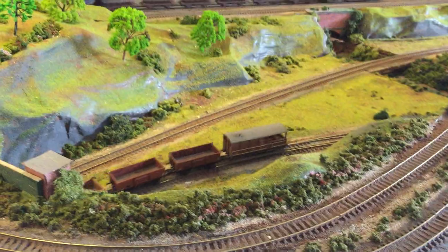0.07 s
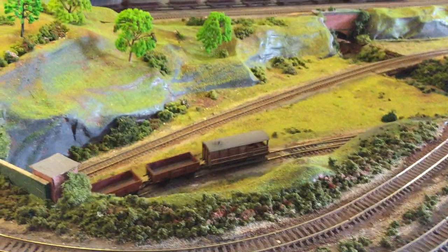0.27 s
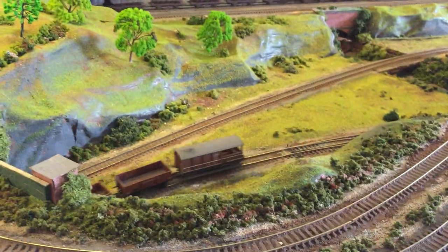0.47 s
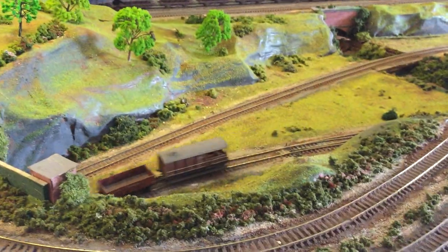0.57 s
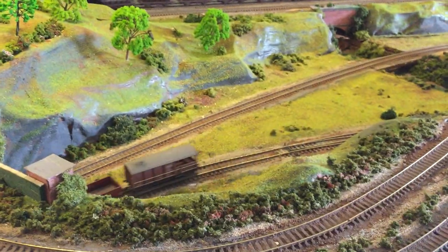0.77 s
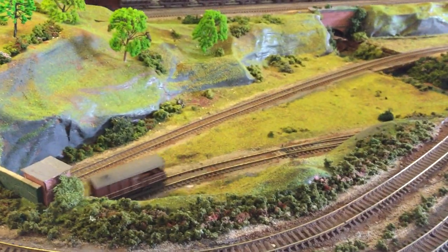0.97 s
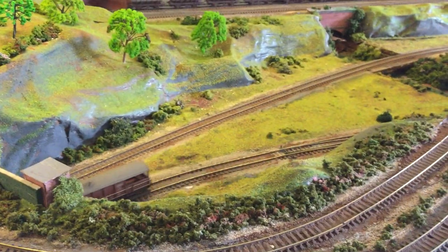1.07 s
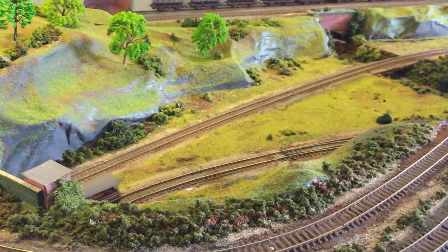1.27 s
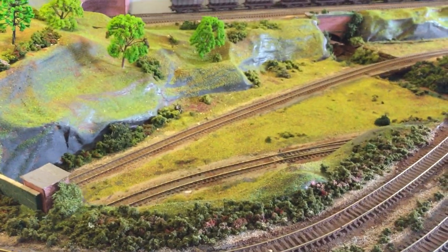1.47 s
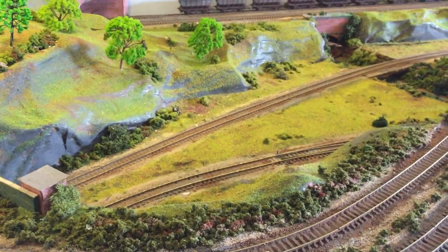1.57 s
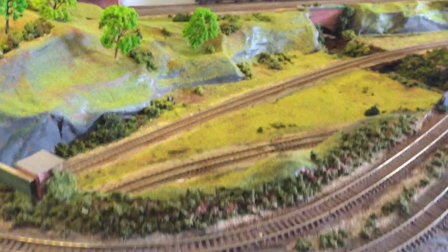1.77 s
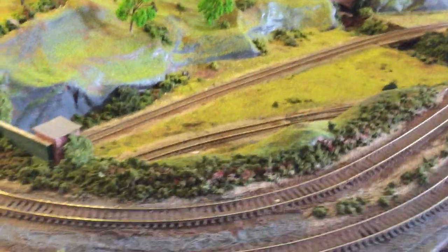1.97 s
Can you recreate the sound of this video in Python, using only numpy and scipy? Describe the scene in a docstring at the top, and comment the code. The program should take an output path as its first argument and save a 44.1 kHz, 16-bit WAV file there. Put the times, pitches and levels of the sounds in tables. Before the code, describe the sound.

A model train rolls with a fine, steady rattle, wheels ticking over rail joints and wagons jolting brightly, then lower near the end; faint motor hum and soft board rumble, close microphone in a furnished room.

```python
"""Indoors, a small model train rolls along its track on a hollow baseboard and runs into a tunnel.
The sound cuts in abruptly on a rattle of tiny wheel and gear impacts, partly repeating with each axle turn.
Wheels tick over rail joints, jolting wagons ring the track near 2 kHz, and a track resonance swells midway;
later most jolts ring lower, near 1.3 kHz, and the faint sine-line hum of the drive rises and falls back.
Throughout, the board drums softly in low swells and filtered noise, and a short room tail reaches the microphone."""
import sys
import numpy as np
from scipy import signal
from scipy.fft import rfft, irfft, next_fast_len
from scipy.io import wavfile
from scipy.ndimage import map_coordinates

SR = 44100
rng = np.random.default_rng(int(sys.argv[2]) if len(sys.argv) > 2 else 0)


def master_out(mix):
    """Clip the mix to full scale and print it as 16-bit PCM to the path in sys.argv[1]."""
    frames = np.transpose(np.atleast_2d(mix))
    ceiling = np.clip(frames, -1, 1)
    pcm = np.round(ceiling * 32767).astype(np.int16)
    wavfile.write(sys.argv[1], SR, pcm)


N = 88993
AXLE_HZ, SPEED_WANDER = 10.515, .0012  # mean axle turns per second; wander as a share of that speed


def amp(db):
    """Decibels to gain."""
    return 10 ** (np.asarray(db) / 20)


def unit(x):
    """Scale to rms 1."""
    return x / np.sqrt(np.mean(x ** 2) + 1e-20)


def curve(rows):
    """(s, value) points as one value per sample."""
    return np.interp(np.arange(N) / SR, *np.transpose(rows))


def wobble(rate):
    """A smooth random curve, rate knots a second."""
    knots = rng.standard_normal(1024)
    return map_coordinates(knots, [np.arange(N) * rate / SR], mode="wrap")


def colour(x, points):
    """Causal minimum-phase filter with the gain of the (Hz, dB) points, by folding the cepstrum."""
    m = 2 * next_fast_len(len(x))
    f, db = np.transpose(points)
    bins_hz = np.fft.rfftfreq(m, 1 / SR)
    gain = amp(np.interp(np.log(bins_hz + 1), np.log(f + 1), db))
    cepstrum = irfft(np.log(gain), m)
    cepstrum[1:m // 2] *= 2
    cepstrum[m // 2 + 1:] = 0
    response = np.exp(rfft(cepstrum))
    return irfft(rfft(x, m) * response, m)[:len(x)]


def resonate(x, hz, width_hz):
    """x through one steep resonance (two equal band-passes in a row), at rms 1."""
    m = 2 * next_fast_len(N)
    f = np.fft.rfftfreq(m, 1 / SR)
    damping = 1j * f * width_hz * np.sqrt(2)
    response = (damping / (hz * hz - f * f + damping)) ** 2
    return unit(irfft(rfft(x, m) * response, m)[:N])


ROOM_T60_S = 0.28


def room(x, count=12):
    """The short tail of a furnished room; its reflections change as the train moves on."""
    t = np.arange(SR // 2) / SR
    place, out = np.linspace(0, count - 1, N), np.zeros(N)
    for k in range(count):
        tail = rng.standard_normal(len(t)) * amp(-60 * t / ROOM_T60_S)
        tail *= t > .004  # the first reflection comes after 4 ms
        here = np.sqrt(np.maximum(1 - np.abs(place - k), 0))  # crossfade from place to place
        out += signal.fftconvolve(x * here, tail / np.linalg.norm(tail))[:N]
    return out


# Colour of the board's rumble. Each row: frequency in Hz, relative level in dB per Hz.
RUMBLE_COLOUR = [(20, -37), (36, -35), (48, -11), (65, -6), (95, -3.5), (130, 5.5), (210, 0), (310, 1),
                 (420, -6), (600, -20.5), (1200, -32), (4000, -68)]
# Swells of the board's main mode. Each row: centre in seconds, Gaussian spread in seconds, level in dB, pitch in Hz.
BOARD_SWELLS = [(.218, 0.018, -33, 119.1), (0.51, 0.021, -41.5, 124.5), (0.602, 0.022, -48, 123.7),
                (0.7, 0.016, -43, 126.6), (0.786, 0.02, -35.5, 122.7), (0.878, 0.02, -42.5, 127.3),
                (1.01, 0.018, -39.5, 120.9), (1.167, 0.027, -33, 121.3), (1.28, 0.021, -39.5, 119.1),
                (1.399, 0.012, -36.5, 122.1), (1.563, 0.03, -36.5, 118.2), (1.61, 0.017, -37, 131),
                (1.705, 0.016, -37, 116.5), (1.758, 0.0098, -35, 123.2), (2, 0.018, -47, 122.1)]
# Surges of the rumble. Each row: centre in seconds, Gaussian spread in seconds, level in dB, pitch in Hz.
RUMBLE_SURGES = [(0.242, 0.057, -44, 260), (0.38, 0.02, -49, 70.6), (0.557, .025, -55, 69),
                 (0.747, 0.023, -53, 69), (.79, 0.076, -46, 188), (1.015, 0.02, -40, 283),
                 (1.13, 0.0076, -39.5, 610), (1.167, 0.031, -45.5, 208), (1.306, 0.02, -44, 270),
                 (1.418, 0.013, -38.5, 286), (1.64, 0.023, -43.5, 396), (1.938, 0.011, -45, 286)]
RUMBLE_DB = -43
SURGE_WIDTH = 0.45  # share of the pitch


def baseboard():
    """The board drums in swells on its main mode, over a broad rumble that surges now and then."""
    t = np.arange(N) / SR

    def swell(s, spread_s, db):
        return amp(db) * np.exp(-.5 * ((t - s) / spread_s) ** 2)

    size = sum(swell(s, spread_s, db) for s, spread_s, db, hz in BOARD_SWELLS)
    pitch = curve([(s, hz) for s, spread_s, db, hz in BOARD_SWELLS])
    boom = size * np.sin(2 * np.pi * (np.cumsum(pitch) / SR + rng.random()))
    rumble = amp(RUMBLE_DB) * unit(colour(rng.standard_normal(N), RUMBLE_COLOUR))
    surges = np.zeros(N)
    for s, spread_s, db, hz in RUMBLE_SURGES:
        surges += swell(s, spread_s, db) * resonate(rng.standard_normal(N), hz, SURGE_WIDTH * hz)
    return boom + rumble + surges


# Hum lines of motor and gears. Each entry: multiple of the axle rate.
HUM_MULTIPLES = [110, 120, 125, 129, 138, 144, 174, 209]
# Strength of those lines, in the same order. Each entry: relative level in dB.
HUM_LINE_DB = [-11.5, -23, -7, -6, -9.5, -5, -26, -16.5]
# Course of the whole hum. Each row: time in seconds, level in dB.
HUM_COURSE = [(.1, -44), (.9, -46), (1.35, -43.5), (1.8, -40.5), (2.0, -45)]


def drive(turns):
    """Motor and gears hum on high multiples of the axle rate, each line a little unsteady."""
    lines = np.zeros(N)
    for multiple, db in zip(HUM_MULTIPLES, HUM_LINE_DB):
        line_level = amp(db + 0.32 * wobble(12.0))
        lines += line_level * np.sin(2 * np.pi * (multiple * turns + rng.random()))
    return amp(curve(HUM_COURSE)) * np.sqrt(2) * lines  # root 2 brings a sine to rms 1


REPEAT_SHARE = .15  # share of impact power that returns each axle turn
IMPACTS_PER_S, SIZE_SPREAD_DB = 8000, 2.2  # rate for wheel and rail each; mean excess of the wheel knocks


def impacts(turns):
    """Tiny knocks: some sit at fixed angles of the axle and return each turn, the rest come from the rail."""
    angle, chance, size, sign = rng.random((4, 1024))
    used = chance < IMPACTS_PER_S / AXLE_HZ / len(chance)
    size = amp(-SIZE_SPREAD_DB * np.log(np.maximum(size, 1 / 20)))  # few large, many small
    size = size * np.sign(sign - .5) * used
    laps = np.arange(int(turns[-1]) + 1)[:, None]
    at = np.searchsorted(turns, (laps + angle).ravel())
    wheel = np.bincount(at, np.tile(size, len(laps)), N + 1)[:N]
    rail = (rng.random(N) < IMPACTS_PER_S / SR) * rng.standard_normal(N)
    return np.sqrt(REPEAT_SHARE) * unit(wheel) + np.sqrt(1 - REPEAT_SHARE) * unit(rail)


# The track ringing under the wagons. Each row: time in seconds, pitch in Hz, level in dB.
TRACK_DRIFT = [(0.099, 2245, -48), (.35, 2133, -50), (.5, 2127, -39), (0.679, 2086, -41), (.82, 2232, -33),
               (.93, 2254, -40.5), (1.05, 2199, -36), (1.2, 2227, -39), (1.38, 2205, -42), (1.6, 2191, -46),
               (2.0, 2203, -50)]
TRACK_RING_WIDTH_HZ = 220


def track_ring(turns):
    """The impacts keep one narrow resonance of the track ringing; it drifts in pitch with the train's place."""
    pitch = curve([(s, hz) for s, hz, db in TRACK_DRIFT])
    level_db = curve([(s, db) for s, hz, db in TRACK_DRIFT])
    ring = signal.hilbert(resonate(impacts(turns), pitch.mean(), TRACK_RING_WIDTH_HZ))
    drift = np.exp(2j * np.pi * np.cumsum(pitch - pitch.mean()) / SR)  # shifts the ring off its mean pitch
    return amp(level_db) * np.real(ring * drift)


# Wheels on rail joints. Each row: start in seconds, level in dB before JOINT_DB, clack and bright edge
# in dB relative to the rail ring, time to fall 60 dB in seconds.
JOINT_TICKS = [(0.138, -24.5, 5, -6.5, 0.026), (.189, -21.5, -3, -15, 0.032), (0.199, -26.5, -3, -18, .03),
               (.213, -35, 8, -12, 0.026), (.244, -33.5, 11, -14, 0.036), (0.269, -26, 5.5, -9, 0.033),
               (0.358, -27.5, 3, -18, 0.028), (.377, -24.5, -11, -11, .02), (0.427, -23.5, 8, -7.5, 0.025),
               (.46, -36, 18, -18, 0.022), (.487, -41, -7, 4, .018), (.594, -32, -4, -7, .025),
               (0.76, -29, -3, -4, .02), (0.767, -29.5, 8, -2, 0.032), (.796, -19, 1, -13, 0.028),
               (0.884, -32, 12, -2, 0.026), (0.944, -34, 3, -6, .03), (1.056, -43, -10, 6, .015),
               (1.128, -36, 6, -7, .02), (1.169, -27.5, 7.5, -6, 0.026), (1.282, -34, 11, -10, 0.056),
               (1.299, -32, 5, -7, .03), (1.335, -25.5, -14, -10, 0.028), (1.46, -30, -14, 0, 0.022),
               (1.469, -33, 10, -12, 0.025), (1.682, -21.5, 2, -2, 0.012), (1.702, -28, -8, -10, 0.029),
               (1.908, -27, -3, -7, 0.045), (1.912, -26.5, 3, -9, 0.027), (1.967, -29.5, -9, -6, 0.031)]
# Colours of the rail ring, the plastic clack and the bright edge. Each row: frequency in Hz, relative level in dB.
RING_COLOUR = [(1000, -21), (3200, -20), (4500, 6), (6000, 1.5), (8000, -8.5), (10500, -21), (16000, -31)]
CLACK_COLOUR = [(300, -27), (1000, 6), (2200, -27), (3500, 4), (5000, -13), (10000, -28)]
EDGE_COLOUR = [(3000, -45), (7000, 5), (9000, 6.5), (10500, -2), (12500, 2), (15700, -6)]
JOINT_DB, JOINT_ATTACK_S = -7, 0.001


def joints():
    """Each wheel over a gap gives a short tick: rail ring, plastic clack and a bright edge."""
    out, t = np.zeros(N + SR), np.arange(SR // 8) / SR
    for s, db, clack_db, edge_db, t60 in JOINT_TICKS:
        shape = (1 - np.exp(-t / JOINT_ATTACK_S)) * amp(-60 * t / t60)
        ring = unit(colour(rng.standard_normal(len(t)), RING_COLOUR))
        clack = unit(colour(rng.standard_normal(len(t)), CLACK_COLOUR))
        edge = unit(colour(rng.standard_normal(len(t)), EDGE_COLOUR))
        tick = ring + amp(clack_db) * clack + amp(edge_db) * edge
        out[round(s * SR):][:len(t)] += amp(db + JOINT_DB) * shape * tick
    return out[:N]


# Wagons jolt and ring the track beneath them. Each row: start in seconds, level in dB, pitch in Hz,
# time for the ring to fall 60 dB in seconds.
JOLTS = [(.141, -27, 2260, .03), (.19, -33, 2200, .03), (.375, -24, 2040, 0.036),
         (.461, -21.5, 2176, 0.051), (.505, -28, 1990, 0.034), (.533, -18.5, 2060, 0.028),
         (.57, -22, 2090, 0.035), (.657, -21, 2030, 0.037), (.701, -24, 2150, 0.04), (.712, -28, 1970, .04),
         (.751, -26, 2130, .03), (.836, -27, 2135, 0.056), (.847, -27, 2300, .04), (.858, -29, 2197, 0.045),
         (.903, -21.5, 2200, 0.032), (.928, -26, 2180, 0.035), (.941, -19.5, 2260, 0.03),
         (.957, -22, 2210, .03), (1.025, -21, 2195, 0.047), (1.037, -25, 2210, .04),
         (1.064, -28, 2060, 0.034), (1.087, -24, 2170, 0.035), (1.131, -25, 2100, 0.033),
         (1.215, -24.5, 2120, 0.041), (1.227, -23, 2150, .04), (1.347, -28, 1355, 0.061),
         (1.47, -20, 3000, .02), (1.533, -37, 1320, .05), (1.557, -24, 1350, .05), (1.601, -35, 1380, .05),
         (1.64, -22.5, 1370, 0.041), (1.687, -22, 1299, 0.043), (1.723, -26, 1275, 0.044),
         (1.871, -23.5, 1370, 0.065)]
JOLT_ATTACK_S = 0.0014
CHATTER_DB, CHATTER_T60_S = -8, 0.034  # chatter level is relative to the jolt


def knocks():
    """Each jolt rings one short resonance and shakes the wagon's loose parts."""
    out, t = np.zeros(N + SR), np.arange(SR // 8) / SR
    attack = 1 - np.exp(-t / JOLT_ATTACK_S)
    for s, db, hz, t60 in JOLTS:
        ring = amp(-60 * t / t60) * np.sin(2 * np.pi * (hz * t + rng.random()))
        loose_parts = unit(colour(rng.standard_normal(len(t)), RATTLE_COLOUR))
        chatter = amp(CHATTER_DB - 60 * t / CHATTER_T60_S) * loose_parts
        out[round(s * SR):][:len(t)] += amp(db) * attack * (ring + chatter)
    return out[:N]


# Course of the rolling rattle. Each row: time in seconds, level in dB before ROLL_DB.
ROLL_COURSE = [(.1, -38), (.25, -37.5), (.38, -38.5), (.65, -39), (.92, -38.5), (1.1, -39.5), (1.35, -39),
               (1.55, -40), (1.8, -40.5), (2.0, -40.5)]
# Colour of the rattle, also of the jolts' chatter. Each row: frequency in Hz, relative level in dB per Hz.
RATTLE_COLOUR = [(150, -30), (300, -8.5), (500, -10.5), (700, -4.5), (850, -6.5), (1050, -1.5),
                 (1500, -1.5), (1850, 0.5), (2400, 0.5), (2750, -3), (3900, -6), (5000, -14), (6200, -15.5),
                 (7200, -22), (9300, -25.5), (10400, -32.5), (11500, -29), (13500, -34), (15700, -37)]
# Resonances of track bed and tunnel. Each row: pitch in Hz, width in Hz, level in dB,
# time of nearest passing in seconds, reach in seconds (the level is halved that far from it).
PASSED_PLACES = [(2540, 380, -40.5, 0.2, 0.33), (1720, 350, -46.5, 0.22, 0.38),
                 (1473, 160, -41, 0.96, 0.32), (1023, 240, -45.5, 1.14, 0.18), (1230, 124, -44, 1.7, 1),
                 (1340, 127, -38.5, 1.77, 0.39), (1680, 350, -38.5, 2.07, 0.34),
                 (620, 240, -47.5, 1.68, 0.3), (3320, 970, -45.5, 0.71, 0.38)]
ROLL_DB, FLUTTER_DB = 4.5, 1.03


def rolling(turns):
    """The impacts rattle the whole train; each place along the track rings more the nearer the wheels are."""
    t = np.arange(N) / SR
    level_db = curve(ROLL_COURSE) + ROLL_DB + FLUTTER_DB * wobble(45.25)
    out = amp(level_db) * unit(colour(impacts(turns), RATTLE_COLOUR))
    taps = impacts(turns)
    for hz, width_hz, db, nearest_s, reach_s in PASSED_PLACES:
        nearness = 1 / (1 + ((t - nearest_s) / reach_s) ** 2)
        shifted_taps = np.roll(taps, rng.integers(N))  # so that the places do not ring in step
        out = out + amp(db) * nearness * resonate(shifted_taps, hz, width_hz)
    return out


ROOM_DB = -9.5


def scene():
    """One axle speed drives rattle and hum; the room answers the clatter."""
    turns = np.cumsum(AXLE_HZ * (1 + SPEED_WANDER * wobble(4))) / SR
    clatter = rolling(turns) + track_ring(turns) + joints() + knocks()
    near_and_room = clatter + amp(ROOM_DB) * room(clatter)
    return (near_and_room + drive(turns) + baseboard())[None]


START_S, TOP_HZ = .084, 15750  # where the sound cuts in; band limit


def record(dry):
    """The sound starts abruptly and holds nothing above the band limit."""
    m = next_fast_len(N + SR // 2)
    live = dry * (np.arange(N) / SR >= START_S)
    passed = np.fft.rfftfreq(m, 1 / SR) < TOP_HZ
    return irfft(rfft(live, m) * passed, m)[:, :N]


dry = scene()
out = record(dry)
master_out(out)
```